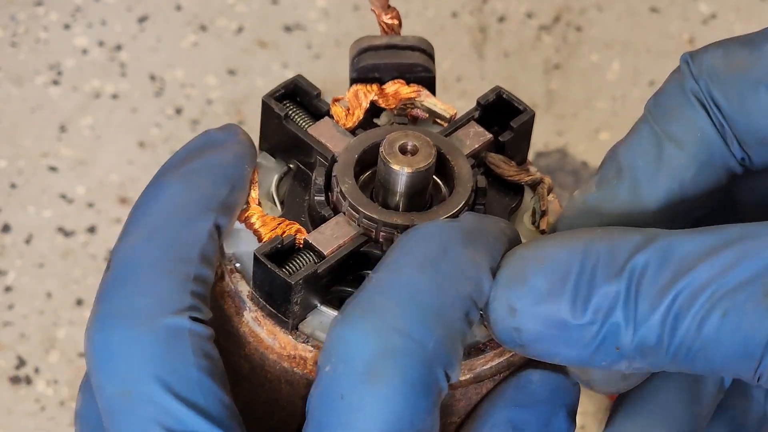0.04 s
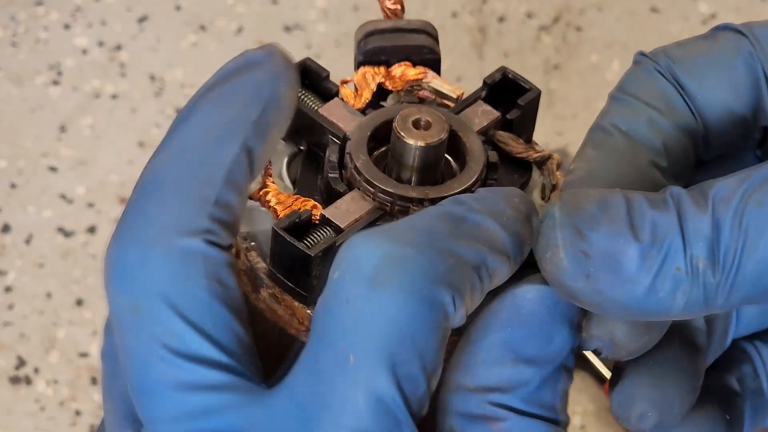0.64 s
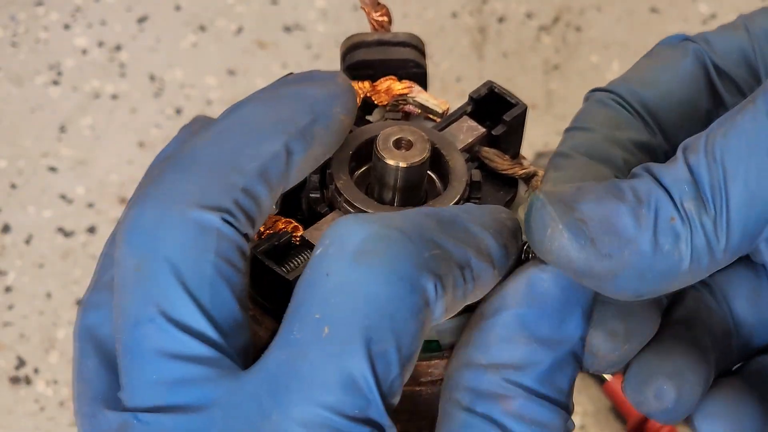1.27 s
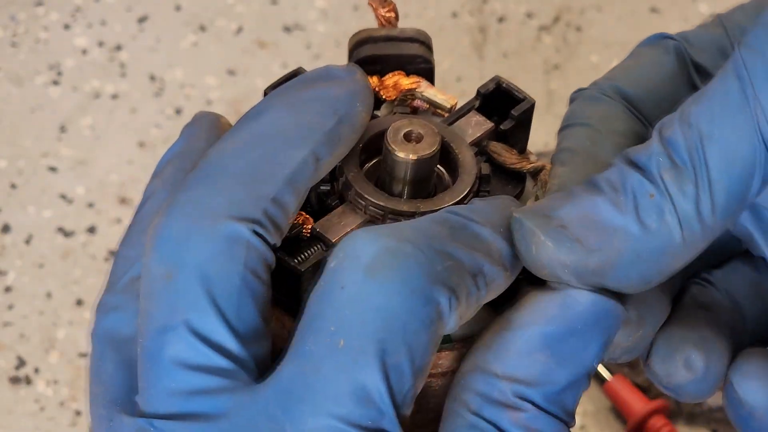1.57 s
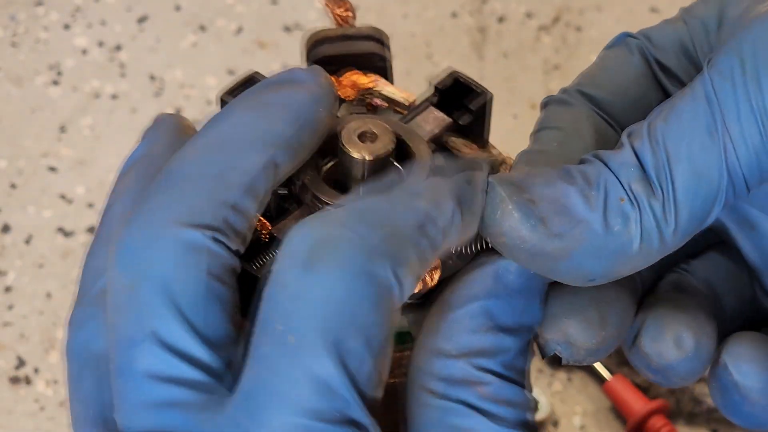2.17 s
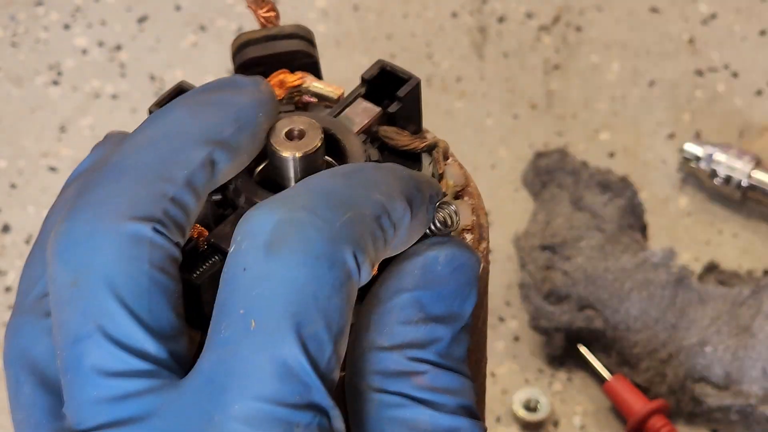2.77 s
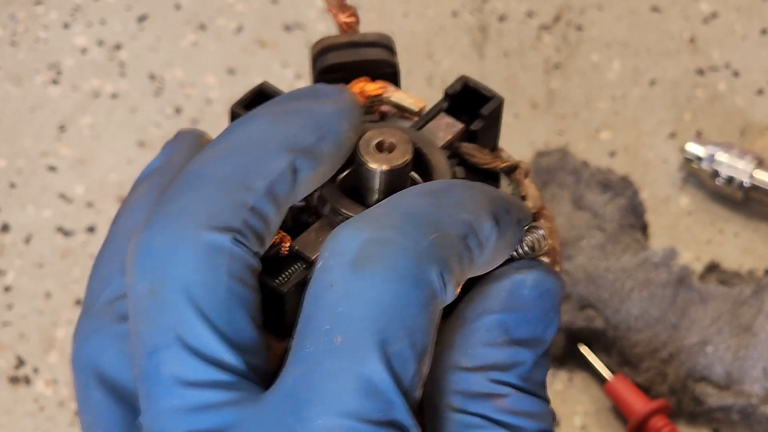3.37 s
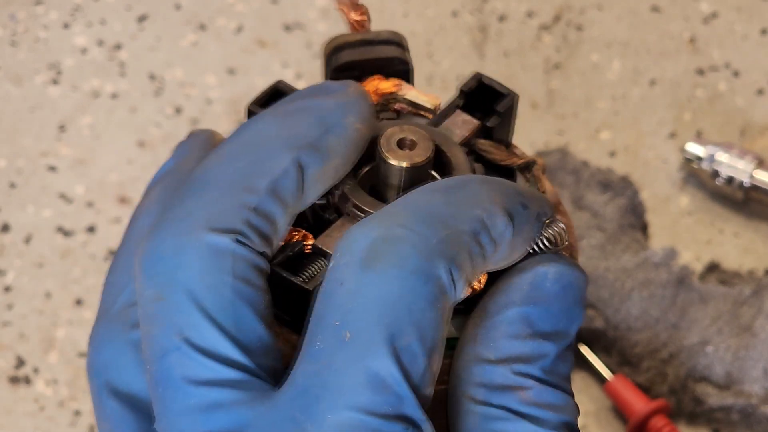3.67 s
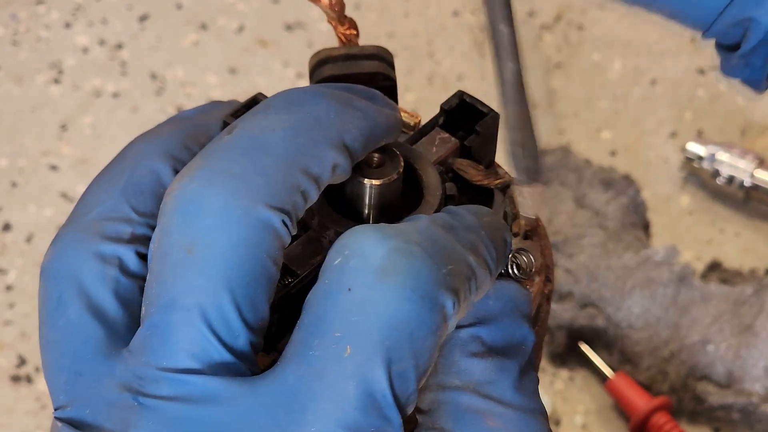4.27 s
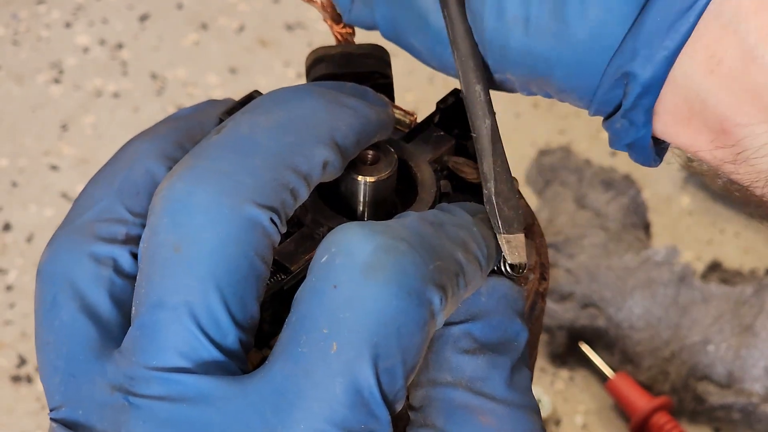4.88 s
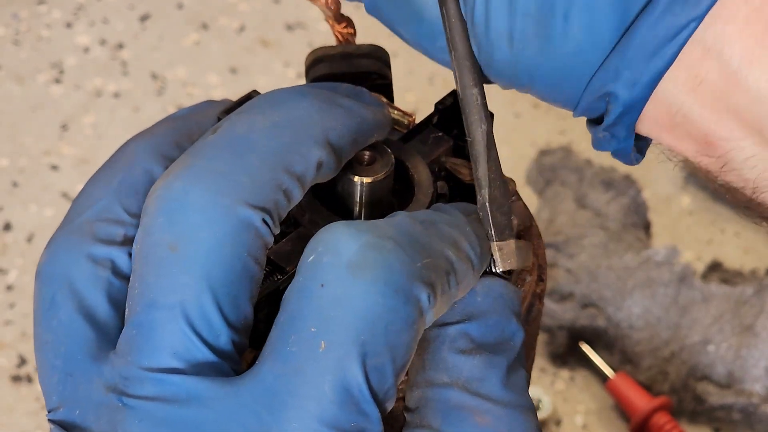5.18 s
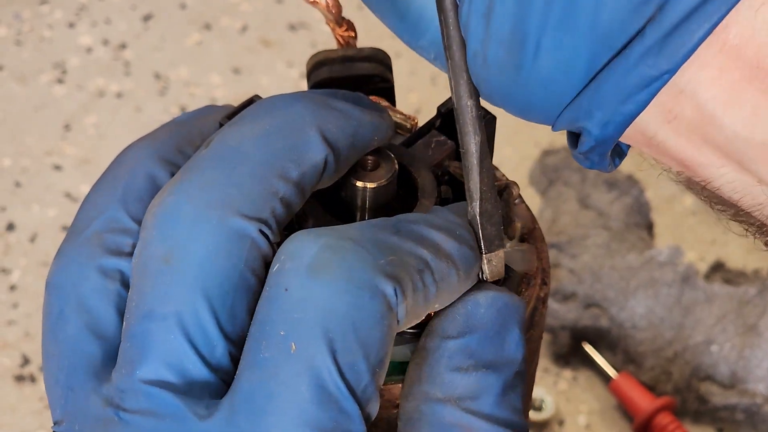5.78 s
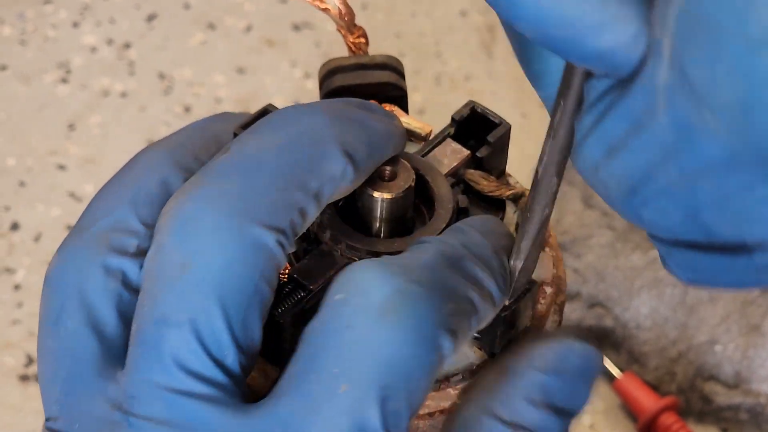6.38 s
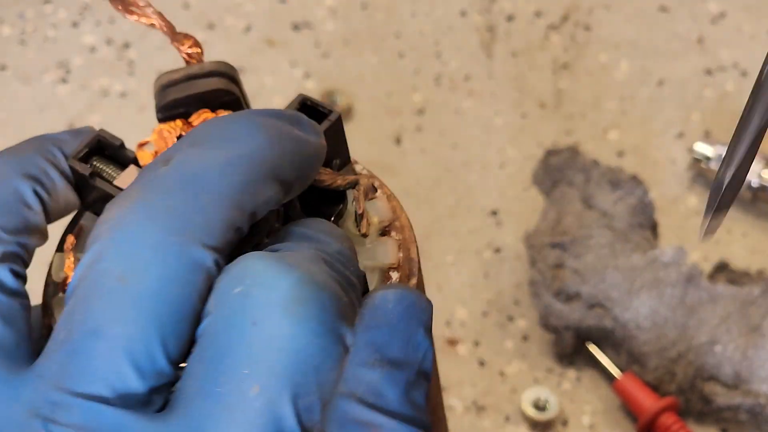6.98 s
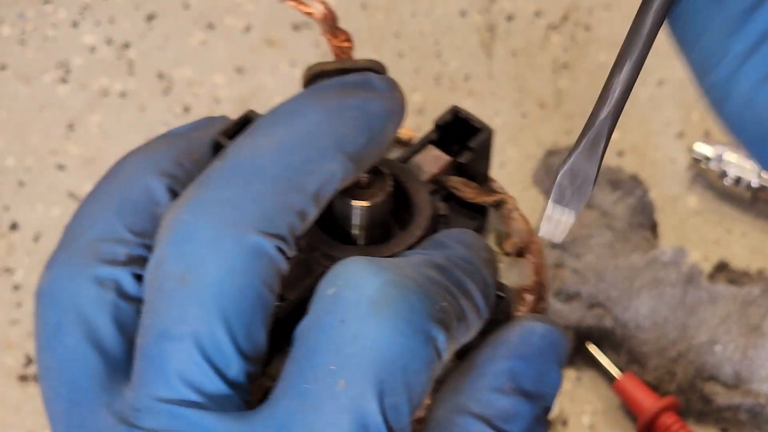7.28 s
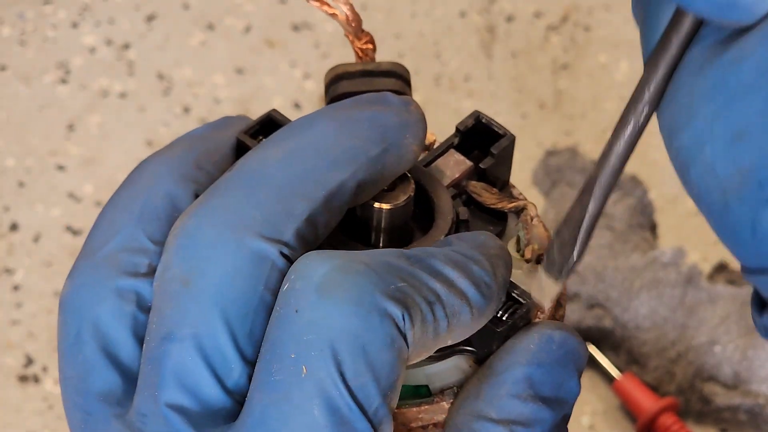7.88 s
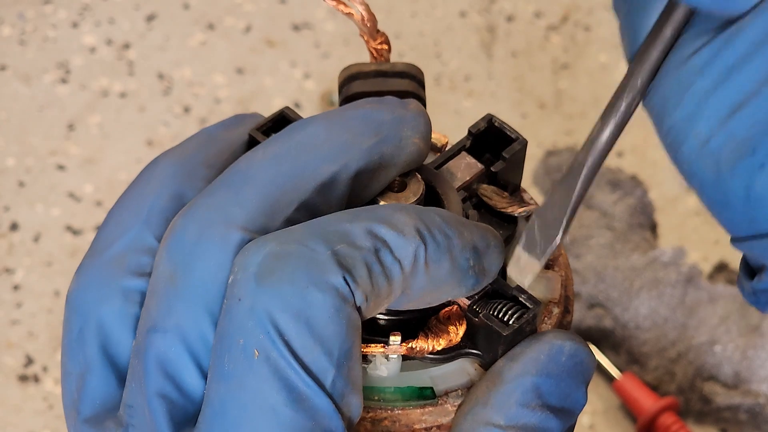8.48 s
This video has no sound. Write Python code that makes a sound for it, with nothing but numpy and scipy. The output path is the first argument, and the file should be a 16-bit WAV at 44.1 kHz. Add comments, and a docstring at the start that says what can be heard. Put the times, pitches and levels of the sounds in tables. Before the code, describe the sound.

Small spring-loaded motor parts are pressed into place close to the microphone. A sharp snap with a short spring ping comes first, then scattered clicks and the soft slip of rubber gloves. A screwdriver clinks and drags over other steel as it is picked up, with dull bumps on the bench. More snaps and brief grating scrapes follow. The workshop rumbles quietly and a small bird sings far outside.

```python
"""Fitting brushes into a starter motor

Close up, gloved hands press spring-loaded brushes into their holder: sharp snaps, a pinging spring,
the slip and hiss of rubber gloves. A screwdriver clinks and drags over other steel as it is picked up,
then grates across the springs, and the bench takes dull bumps. The workshop rumbles quietly;
far outside a small bird sings, and a faint whine climbs and fades."""
import sys
import numpy as np
from scipy import signal
from scipy.fft import rfft, irfft, next_fast_len
from scipy.io import wavfile

SR = 44100
rng = np.random.default_rng(int(sys.argv[2]) if len(sys.argv) > 2 else 0)


def wav_record(signal):
    """Record a signal, one row per channel, as 16-bit PCM in the file named by sys.argv[1]."""
    frames = np.transpose(np.atleast_2d(signal))
    bounded = np.clip(frames, -1, 1)
    # unit amplitude maps onto the largest positive 16-bit level
    quanta = np.round(bounded * 32767).astype(np.int16)
    wavfile.write(sys.argv[1], SR, quanta)


N = 376613
TIME = np.arange(N) / SR

# snaps of brush, spring and blade: start_s, level_db, large_part_hz, small_part_hz, contact_ms
SNAP_HITS = [(0.0564, -35.5, 2230, 3050, .055), (0.057, -38.5, 3200, 7900, .04),
             (1.737, -73, 5970, 8500, .07), (2.2745, -33, 1810, 4420, .1),
             (2.2745, -47.5, 8100, 14400, .02), (2.882, -37, 2800, 5660, .075),
             (2.9114, -32, 2720, 3480, .19), (3.0125, -34.5, 5320, 6140, .085),
             (3.0198, -39, 5040, 9000, .06), (3.0875, -40, 2320, 2800, .12), (3.1918, -47, 2450, 3700, .15),
             (3.2898, -51, 4060, 5700, .1), (3.435, -54.5, 1920, 2120, .2), (3.5099, -53, 2180, 2340, 0.29),
             (4.152, -60, 1430, 2800, .2), (4.954, -60, 3760, 7590, .05), (4.978, -64, 3660, 11000, 0.033),
             (4.982, -52, 3740, 9060, .04), (5.818, -48.5, 3710, 5800, .06),
             (5.96, -29.5, 1964, 3700, .042), (5.96, -27.5, 14000, 14900, .02),
             (6.2041, -37, 4100, 5740, 0.066), (6.688, -46, 1530, 2210, .2),
             (7.518, -39.5, 1900, 4700, .07), (7.5242, -44, 2140, 2500, .18),
             (7.579, -52.5, 4340, 5400, .1), (8.2934, -61, 11300, 13000, .019)]
# ring of the steel tools: pitch_hz, level_db, t60_s
STEEL_MODES = [(1895, -3, .13), (2950, -9, .14), (3605, -9, .14), (4070, -8, .1), (4500, -4, .1),
               (4968, 1, .135), (6190, -5, .1), (7520, 0, .12), (8530, -10, .12), (8830, -5, .15),
               (11090, -4, .17), (11360, -10, .13), (12690, -13, .09), (13340, -14, .1), (14540, -5, .13)]


def from_db(db):
    """Decibels to gain."""
    return 10 ** (np.asarray(db) / 20)


def rms_one(x):
    """Scale to an rms of 1."""
    return x / np.sqrt(np.mean(x ** 2) + 1e-20)


def at_hz(points, hz):
    """Read a curve along a log-frequency axis."""
    freqs, values = np.transpose(points)
    return np.interp(np.log(hz), np.log(freqs), values)


def add(out, s, sound):
    """Mix a sound in at s seconds."""
    i = max(0, round(s * SR))
    out[..., i:i + sound.shape[-1]] += sound[..., :N - i]


def drift(rate, size=N):
    """A random wander of spread about 1, turning rate times a second."""
    knots = rng.standard_normal(int(size / SR * rate) + 2)
    return np.interp(np.arange(size) / SR * rate, np.arange(len(knots)), knots)


def band(x, low, high):
    """Band-pass between two edges in Hz."""
    sos = signal.butter(2, [low, min(high, SR / 2.1)], "band", fs=SR, output="sos")
    return signal.sosfilt(sos, x + 1e-18)


def bands(low, high, count):
    """Low edge, centre and high edge of bands evenly spread in pitch."""
    edges = np.geomspace(low, high, count + 1)
    return zip(edges, np.sqrt(edges[:-1] * edges[1:]), edges[1:])


def resonate(x, hz, width, stages=1):
    """A damped resonance; each further stage narrows it and steepens its skirts."""
    r = np.exp(-np.pi * width / SR)
    for _ in range(stages):
        x = signal.lfilter([1 - r, 0, r - 1], [1, -2 * r * np.cos(2 * np.pi * hz / SR), r * r], x + 1e-18)
    return x


def stereo(three, alike, lag_s=.000085):
    """Of three signals, the first is shared and reaches the left first; the others go one to each side."""
    size = next_fast_len(three.shape[1] + 64)
    delay = np.exp(-2j * np.pi * np.fft.rfftfreq(size, 1 / SR) * lag_s)
    later = irfft(rfft(three[0], size) * delay, size)[:three.shape[1]]
    return np.sqrt(alike) * np.stack([three[0], later]) + np.sqrt(1 - alike) * three[1:]


def room_noise(spectrum, low_hz, high_hz, count):
    """Steady noise, centred in the bass and diffuse above; rms 1."""
    # likeness of left and right: frequency_hz, correlation
    likeness = [(60, 0.98), (125, 0.97), (250, 0.88), (500, 0.51), (1000, 0), (4000, 0.082)]
    out, white = 0, rng.standard_normal((2, 2, N))
    for k, (low, hz, high) in enumerate(bands(low_hz, high_hz, count)):
        mid, side = band(white[k % 2], low, high)
        alike = at_hz(likeness, hz)
        spread = np.sqrt(1 + alike) * mid + np.sqrt(1 - alike) * side * [[1], [-1]]
        out = out + from_db(at_hz(spectrum, hz)) * spread
    return rms_one(out)


def room_tone(drone_hz=67.8, drone_db=-5, rumble_db=-2, air_db=-53.5):
    """Rumble with a droning room resonance, under thin air that leans left."""
    # colour of the rumble: frequency_hz, density_db
    rumble_colour = [(20, -32), (32, -32.5), (45, -6.5), (58, -6), (70, -1.5), (85, -11), (110, -14.5)]
    # colour of the air: frequency_hz, density_db
    air_colour = [(100, -6), (170, -15.5), (250, -21.5), (450, -25.5), (800, -35.5), (1200, -35),
                  (1850, -34.5), (2600, -42.5), (4000, -44.5), (7000, -48.5), (9300, -67), (12000, -53.5),
                  (16000, -75.5)]
    # fader ride on rumble and drone: time_s, level_db
    rumble_ride = [(0, -39), (2.2, -39), (3.7, -37.5), (4.3, -43), (6.7, -40), (8.54, -44)]
    drone = rms_one(resonate(rng.standard_normal(N), drone_hz, width=18, stages=2))
    rumble = from_db(rumble_db) * room_noise(rumble_colour, 19.24, 120.8, count=8)
    air = from_db(air_db) * room_noise(air_colour, 106.9, 15600, count=16) * from_db([[1], [-1]])
    fader = from_db(np.interp(TIME, *np.transpose(rumble_ride)))
    return fader * (rumble + from_db(drone_db) * drone) + air


def snap_db(db, contact_ms, hz, rise_db_per_octave=.2, rolloff=6.5):
    """Small parts radiate treble best, up to one over the contact time: longer contact is duller."""
    dulling_db = 10 * np.log10(1 + (hz * contact_ms / 1000) ** rolloff)
    return db + rise_db_per_octave * np.log2(hz / 4000) - dulling_db


def snaps(crack_t60_s=.0052, rebound_s=.0017, rebound_db=-5.5, chatter_t60_s=.07, chatter_db=-25):
    """A crack and one bounce ring the two parts that meet; the holder also takes the spring's chatter."""
    # damped resonances of the hand-held brush holder: pitch_hz, width_hz, level_db
    holder_modes = [(400, 77, -21.5), (1290, 700, -20), (1860, 850, -7.5), (2100, 290, -16),
                    (3240, 750, -6.5), (4170, 1000, -4), (5500, 1600, -1), (7100, 350, -5), (8100, 430, -8),
                    (11600, 1500, -12), (13780, 540, -11), (14500, 810, -6.5)]
    out, t = np.zeros((2, N)), np.arange(SR // 8) / SR
    low_cut = signal.butter(1, 3000, "high", fs=SR, output="sos")
    rebound = (t > rebound_s) * from_db(rebound_db - 60 * np.abs(t - rebound_s) / crack_t60_s)
    blow = from_db(-60 * t / crack_t60_s) + rebound
    for s, db, *part_pitches, contact_ms in SNAP_HITS:
        noise = stereo(rng.standard_normal((3, len(t))), alike=.6)
        crack = noise * blow
        chatter = signal.sosfilt(low_cut, noise) * from_db(chatter_db - 60 * t / chatter_t60_s)
        parts = [(crack, hz, hz / 5.4, 1) for hz in part_pitches]
        holder = [(crack + chatter, *row) for row in holder_modes]
        for force, hz, width, mode_db in parts + holder:
            ring = resonate(force, hz, width * 1.12, stages=2)
            ring *= np.sqrt(.0085 * SR / np.sum(ring ** 2, axis=1, keepdims=True))   # equal energy
            add(out, s, ring * from_db(mode_db - .1 + snap_db(db, contact_ms, hz)))
    return out


def snap_spray(t60_s=.06):
    """Each snap scatters off the hands; its resonances average out, so the walls get a broad crack."""
    out, t = np.zeros(N), np.arange(SR // 16) / SR
    for s, db, _, _, contact_ms in SNAP_HITS:
        for low, hz, high in bands(1500, 23000, count=4):
            crack = band(rng.standard_normal(len(t)) * from_db(-60 * t / t60_s), low, high)
            crack *= np.sqrt(.0063 * SR / np.sum(crack ** 2))   # equal energy
            add(out, s, from_db(snap_db(db, contact_ms, hz)) * crack)
    return out


def workshop_reverb(x, stretch=1, rise_s=.00031):
    """Diffuse reflections, different on each side, hanging longest in the mids; unit gain."""
    # decay of the workshop: frequency_hz, t60_s
    decay = [(300, 0.098), (2000, 0.58), (6000, 0.23), (15000, 0.34)]
    tail, t = 0, np.arange(SR * 3 // 4) / SR
    white = rng.standard_normal((2, 2, len(t)))
    for k, (low, hz, high) in enumerate(bands(220, 17150, count=9)):
        tail = tail + band(white[k % 2], low, high) * from_db(-60 * t / (stretch * at_hz(decay, hz)))
    tail *= 1 - np.exp(-t / rise_s)
    tail /= np.sqrt(np.sum(tail ** 2) / 2)
    return signal.fftconvolve(np.atleast_2d(x), tail, axes=1)[:, :N]


def rod_ring(hz, t60, rise_s=.00011, detune=.0021, twin_db=-19, twin_lasts=1.6):
    """A struck rod bends in two planes of slightly different pitch, one less damped."""
    t = np.arange(SR // 2) / SR
    phase = rng.uniform(0, 2 * np.pi) + np.array([[0], [rng.normal(1.44, .17)]])   # left, right
    twin_hz = hz * (1 + detune * rng.normal())
    main = np.sin(2 * np.pi * hz * t - phase) * from_db(-60 * t / t60)
    twin = np.cos(2 * np.pi * twin_hz * t - phase) * from_db(twin_db - 60 * t / (twin_lasts * t60))
    return (main + twin) * (1 - np.exp(-t / rise_s))


def spring_ping():
    """The coil of a spring sings on briefly after it slips."""
    # tones of the plucked spring: start_s, pitch_hz, level_db, t60_s
    tones = [(.0575, 2895, -46, .2), (.0575, 3235, -47, .11)]
    out = np.zeros((2, N))
    for s, hz, db, t60 in tones:
        add(out, s, from_db(db) * rod_ring(hz, t60))
    return out


def glove_rubs(slips_per_s=700, grain_db=-3, flutter_db=2, patchy_db=2.5, rise_share=.62, edge_db=-13,
               ring_db=2, friction_db=-4, soft_hz=13500):
    """Friction: dense, uneven slips over a fine hiss swell with each stroke and ring the rubbed part."""
    # strokes of glove and steel: peak_s, length_s, level_db, tilt_db_per_octave, ring_hz
    strokes = [(0.455, 0.21, -70, 1.5, 6840), (2.068, 0.071, -67.5, 2.5, 5300),
               (2.156, 0.064, -64, 3, 5750), (2.754, 0.058, -59, -2, 7460), (2.881, 0.038, -61.5, 0, 4340),
               (2.926, 0.053, -49, -3, 1420), (3.043, 0.16, -54, -2.5, 910),
               (3.156, 0.6, -62.5, -3.5, 3010), (3.427, 0.13, -61, -2.5, 2930),
               (3.483, 0.053, -57.5, 0, 2160), (3.52, 0.054, -53, 0, 2150), (3.612, 1, -71, -0.5, 7140),
               (3.655, 0.078, -58.5, 2, 1920), (3.714, 0.042, -54.5, 2, 6650),
               (3.916, 0.029, -63.5, 0.5, 6800), (3.979, 0.025, -47.5, 4.5, 6800),
               (3.994, 0.083, -53, 1.5, 2080), (4.13, 0.044, -62.5, 7, 7300),
               (4.192, 0.13, -68.5, 0.5, 7040), (4.284, 0.066, -71, -2, 7150),
               (4.314, 0.065, -60.5, 0.5, 4500), (5.771, 0.021, -64, 6, 8000),
               (5.929, 0.027, -60, -0.5, 6900), (5.964, 0.04, -54, -3, 2040), (6.104, 0.19, -65, 4, 7600),
               (6.215, 0.025, -53, 6, 6040), (6.496, 0.071, -68, 2, 6900), (6.655, 0.026, -49.5, 0, 4180),
               (6.672, 0.022, -46.5, 2, 9100), (6.682, 0.039, -47, 0.5, 2150),
               (7.126, 0.07, -62.5, -2, 5500), (7.178, 0.054, -59, 8.5, 6970),
               (7.238, 0.053, -69.5, -0.5, 6500), (7.528, 0.023, -53, -2.5, 2180),
               (7.56, 0.041, -61, 1, 2200), (7.599, 0.044, -55.5, 2.5, 5500),
               (8.191, 0.067, -71.5, 0.5, 5000)]
    # colour of the friction: frequency_hz, level_db
    colour = [(500, -7), (900, -15), (1300, -6.5), (2000, 0), (3000, 3.5), (4500, 3), (7000, 6.5),
              (10000, -2), (12500, 8.5), (15000, -3.5)]
    sizes = from_db(-.5 * np.minimum(rng.exponential(1, N), 4))
    slips = (rng.random(N) < slips_per_s / SR) * sizes * rng.standard_normal((3, N))
    force = rms_one(from_db(grain_db) * rms_one(slips) + rng.standard_normal((3, N)))
    force = stereo(force, alike=.042) * from_db(flutter_db * drift(120))
    out, swells = np.zeros((2, N)), []
    for s, length, db, tilt, ring_hz in strokes:
        rise, fall = rise_share * length, (1 - rise_share) * length
        span = (TIME > s - 2 * rise) & (TIME < s + 2 * fall)
        t = TIME[span] - s
        swell = from_db(db + edge_db * np.abs(np.where(t < 0, t / rise, t / fall)) ** 1.16)
        swells.append((s + t[0], swell, tilt))
        ring = resonate(force[:, span], ring_hz, width=ring_hz / 5, stages=2)
        add(out, s + t[0], from_db(ring_db) * swell * rms_one(ring))
    for low, hz, high in bands(478, 15600, count=13):
        power = np.zeros(N)
        octaves = np.log2(np.clip(hz, 1800, 7500) / 6500)   # the tilt levels off at both ends
        for start, swell, tilt in swells:
            add(power, start, (swell * from_db(tilt * octaves)) ** 2)
        gain = from_db(friction_db + at_hz(colour, hz) + patchy_db * drift(80))
        gain /= np.hypot(1, (hz / soft_hz) ** 2)
        force = -force   # neighbouring bands join without a notch
        out += rms_one(band(force, low, high)) * np.sqrt(power) * gain
    return out


def bird_note(hz, db):
    """One note swells and fades along a pitch path."""
    tone = np.sqrt(2) * np.sin(2 * np.pi * np.cumsum(hz) / SR)
    return from_db(db) * tone * signal.windows.tukey(len(hz), .7)


def bird(hook_s=.0158, waver_hz=25, wavers_per_s=200, trills_per_s=75):
    """Pure whistles that hook down onto a note, and slurs with a fast, uneven trill."""
    # whistles: start_s, length_s, pitch_hz, hook_hz, level_db
    whistles = [(1.66, 0.19, 2490, 60, -75), (1.829, 0.097, 3360, 610, -56.5),
                (2.211, 0.072, 2995, 293, -55), (2.417, 0.091, 3250, 440, -50.5),
                (4.564, 0.06, 3960, 60, -62), (4.569, 0.061, 3390, 60, -65), (5.6, 0.047, 2660, 40.2, -59),
                (5.713, .22, 3578, 40, -54.5), (6.356, 0.052, 3940, 150, -58.5),
                (6.71, 0.052, 3540, 60, -61), (6.827, 0.084, 3950, 39.8, -58.5)]
    # trilled slurs: start_s, length_s, first_hz, last_hz, warble_hz, level_db
    slurs = [(1.4, 0.4, 4500, 4550, 100, -80), (2.04, 0.14, 4620, 4420, 200, -62.5),
             (2.346, 0.11, 4480, 4330, 130, -61.5), (2.571, 0.15, 2520, 2990, 232, -57.5),
             (3.296, 0.08, 3450, 2730, 300, -52), (3.609, 0.11, 4600, 3720, 350, -50),
             (3.719, 0.13, 3680, 2940, 350, -52.5), (4.406, 0.066, 3800, 3700, 90, -64.5),
             (4.668, 0.076, 3380, 2810, 300, -61), (4.837, 0.11, 3750, 3540, 110, -60),
             (4.98, 0.096, 3000, 2720, 223, -58.5), (5.139, 0.1, 3650, 2790, 320, -58.5),
             (5.355, 0.066, 4550, 3750, 170, -56.5), (5.383, 0.1, 3550, 2940, 150, -57),
             (5.486, 0.09, 2980, 2276, 110, -56), (5.99, 0.12, 3150, 2940, 304, -60),
             (6.088, 0.19, 3540, 3150, 298, -56), (6.215, 0.11, 2800, 3400, 198, -54),
             (6.391, 0.0644, 3403, 2845, 110, -53.5), (6.463, 0.047, 3050, 2820, 40.2, -54),
             (6.542, 0.14, 3260, 3480, 251, -56), (6.776, 0.074, 3270, 2954, 130, -53.5),
             (6.886, 0.07, 3300, 2894, 130, -55)]
    out, waver = np.zeros(N), drift(wavers_per_s)
    trill_rate = trills_per_s * (1 + .2 * drift(30))
    trill = np.sin(2 * np.pi * np.cumsum(trill_rate) / SR) + .5 * waver
    for s, length, hz, hook_hz, db in whistles:
        span = (TIME >= s) & (TIME < s + length)
        hook = hook_hz * np.exp((s - TIME[span]) / hook_s)
        add(out, s, bird_note(hz + hook + waver_hz * waver[span], db))
    for s, length, first_hz, last_hz, warble_hz, db in slurs:
        span = (TIME >= s) & (TIME < s + length)
        glide = np.geomspace(first_hz, last_hz, span.sum())
        add(out, s, bird_note(glide + warble_hz * trill[span], db))
    return out


def tool_clinks(focus_octaves=.064, second_db=-12, others_db=-26, dull_db_per_octave=-15):
    """A knock rings every mode of the steel: most those the contact favours, least those far above."""
    # steel tools knocking together: start_s, level_db, favoured_hz, second_hz
    knocks = [(2.7505, -22.5, 7520, 4500), (2.8825, -36, 11360, 6190), (2.9124, -18.5, 4970, 1895),
              (2.9126, -25.5, 1895, 8830), (2.913, -39, 14540, 11360), (2.936, -28, 11090, 4070),
              (2.937, -32, 4500, 8530), (2.938, -32, 7520, 11360), (2.939, -32, 8530, 14540),
              (2.945, -34, 11360, 6190), (3.013, -30, 4970, 7520), (3.0135, -27.5, 8830, 6190),
              (3.0205, -33, 14540, 7520), (3.021, -35, 2950, 8830), (3.027, -34, 6190, 7520),
              (3.043, -35.5, 14540, 11090), (3.044, -35, 8830, 4970), (3.0875, -42, 7520, 11090)]
    out = np.zeros((2, N))
    for s, db, favoured_hz, second_hz in knocks:
        for hz, mode_db, t60 in STEEL_MODES:
            octaves = np.log2(hz / np.array([favoured_hz, second_hz]))
            favoured, second = np.exp(-(octaves / focus_octaves) ** 2)
            others = from_db(others_db + dull_db_per_octave * max(octaves[0], 0) + rng.normal(0, 5.6))
            share = favoured + from_db(second_db) * second + others
            add(out, s, from_db(db + mode_db) * share * rod_ring(hz, t60))
    return out


def bench_bumps(half_s=.065, uneven=.24):
    """Soft pushes rock the bench for a few uneven cycles."""
    # bumps of motor and hands: centre_s, level_db, pitch_hz
    pushes = [(2.917, -30, 84.5), (3.089, -34, 72), (3.649, -33, 58.3), (3.72, -28.5, 62.4),
              (4.53, -34.5, 153.4), (6.16, -43.5, 149.2), (6.692, -29, 66.4), (6.87, -38.5, 153.2),
              (7.578, -35, 71.3)]
    out, t = np.zeros(N), np.arange(-half_s, half_s, 1 / SR)
    for s, db, hz in pushes:
        phase = 2 * np.pi * np.cumsum(hz * (1 + uneven * drift(hz, len(t)))) / SR
        swell = np.cos(np.pi / 2 * t / half_s) ** 2 * (1 + uneven * drift(hz, len(t)))
        add(out, s - half_s, from_db(db) * np.sin(phase) * swell)
    return out


def shaft_drag(catches_per_s=450, grip_db_per_s=1500, tools_db=-1):
    """The sliding shaft keeps catching, rattling its own modes and short ones of the tools it touches."""
    # slides of steel over steel: peak_s, level_db, fade_db_per_s
    slides = [(2.94, -32.5, 598), (3.021, -35, 600), (3.044, -54, 351), (3.089, -50, 250)]
    catches = (rng.random(N) < catches_per_s / SR) * stereo(rng.standard_normal((3, N)), alike=.55)
    ring = sum(from_db(db) * resonate(catches, hz, width=70) for hz, db, _ in STEEL_MODES)
    for k, (low, _, high) in enumerate(bands(3600, 8900, count=14)):
        ring += (-1) ** k * from_db(tools_db) * resonate(catches, rng.uniform(low, high), width=110)
    swells_db = [db - np.maximum(grip_db_per_s * (s - TIME), fade * (TIME - s)) for s, db, fade in slides]
    pressure_db = np.maximum(np.max(swells_db, axis=0), -200)
    return from_db(pressure_db) * rms_one(ring)


def blade_grates(ticks_per_s=900, uneven_db=2.5, fade_db=-4, bite_s=.004):
    """The blade bites, then ticks unevenly over a spring's turns, ringing the coil as pressure eases."""
    # passes of the blade: start_s, length_s, level_db
    passes = [(3.703, .022, -53), (3.96, .04, -53), (6.654, 0.0408, -48), (7.572, 0.03, -48)]
    # damped ring of the coil: pitch_hz, width_hz, level_db
    coil_modes = [(4310, 690, 1), (5270, 750, -4), (6200, 600, 0), (7350, 700, -16)]
    out = np.zeros((2, N))
    for s, length, db in passes:
        ticks = np.cumsum(rng.uniform(.3, 1.7, 96) / ticks_per_s)
        ticks, ring = ticks[ticks < length], 0
        pressure = from_db(fade_db * ticks / length) * (1 - np.exp(-ticks / bite_s))
        for hz, width, mode_db in coil_modes:
            signs = rng.choice([-1, 1], (3, len(ticks)))
            sizes = pressure * from_db(rng.normal(0, uneven_db, len(ticks)))
            force = np.zeros((3, SR // 8))
            force[:, (ticks * SR).astype(int)] = signs * sizes
            ring = ring + from_db(mode_db) * resonate(stereo(force, alike=.42), hz, width, stages=2)
        add(out, s, from_db(db) * ring * np.sqrt(2 * length * SR / np.sum(ring ** 2)))
    return out


def far_whine(start_s=3.97, length_s=.88, first_hz=1060, last_hz=1420, width_hz=150, level_db=-65):
    """A narrow, unsteady band of noise swells, climbs in pitch and fades."""
    out, size = np.zeros((2, N)), int(length_s * SR)
    sweep = np.exp(2j * np.pi * np.cumsum(np.linspace(first_hz, last_hz, size)) / SR)
    wobbles = [drift(width_hz, size) + 1j * drift(width_hz, size) for side in range(2)]
    tone = np.stack([rms_one((sweep * wobble).real) for wobble in wobbles])
    add(out, start_s, from_db(level_db) * tone * signal.windows.tukey(size, .25))
    return out


def scene(lean_db=.74, snap_send_db=-15, steel_send_db=-15, rub_send_db=-12,
          bird_wet_db=-1.5, bird_dry_db=-5):
    """Close handling a touch to the left, its reflections, the far sounds and the room tone."""
    steel = tool_clinks() + shaft_drag() + spring_ping()
    friction = glove_rubs() + blade_grates()
    song = bird()
    send = from_db(snap_send_db) * snap_spray() + from_db(steel_send_db) * steel
    reflected = workshop_reverb(send + from_db(rub_send_db) * friction)
    near = (snaps() + steel + friction) * from_db([[lean_db], [-lean_db]])
    far_bird = from_db(bird_wet_db) * workshop_reverb(song, stretch=2.1) + from_db(bird_dry_db) * song
    return near + reflected + far_bird + far_whine() + bench_bumps() + room_tone()


def record(dry, cutoff_hz=16000):
    """A steep low-pass takes off the very top."""
    return signal.sosfilt(signal.ellip(10, .1, 80, cutoff_hz, fs=SR, output="sos"), dry)


dry = scene()
out = record(dry)
wav_record(out)
```